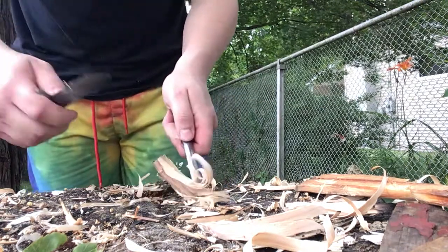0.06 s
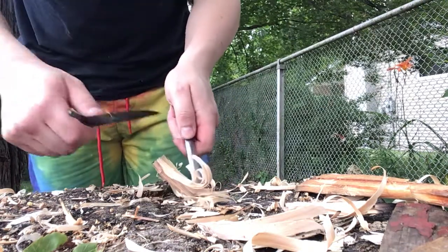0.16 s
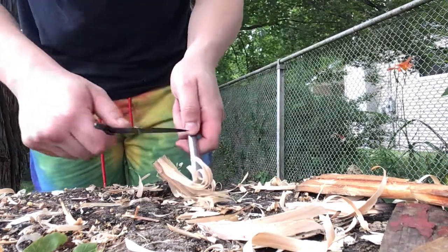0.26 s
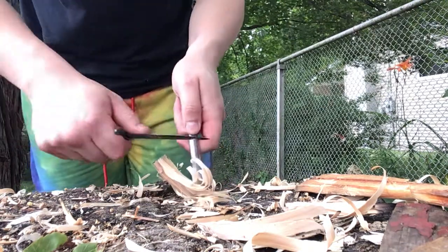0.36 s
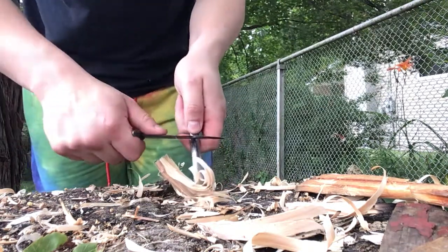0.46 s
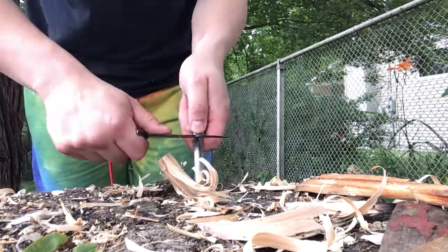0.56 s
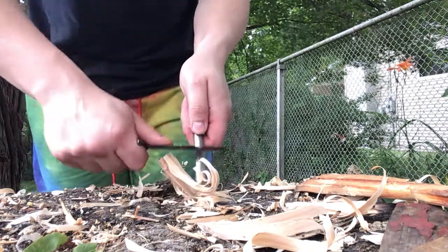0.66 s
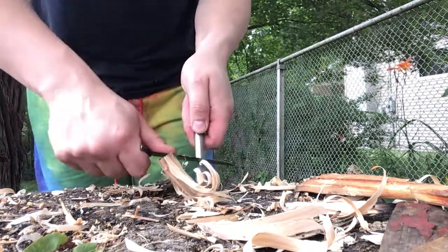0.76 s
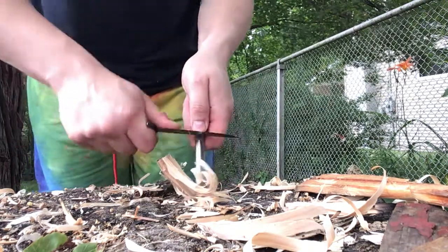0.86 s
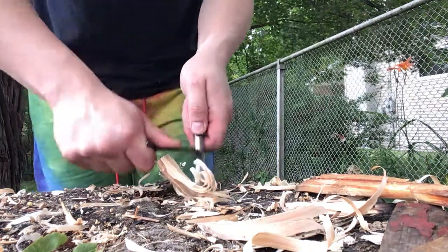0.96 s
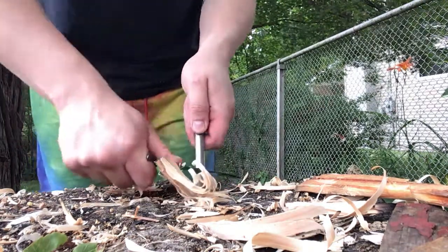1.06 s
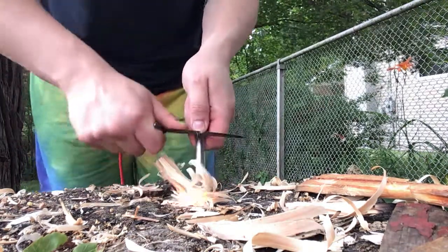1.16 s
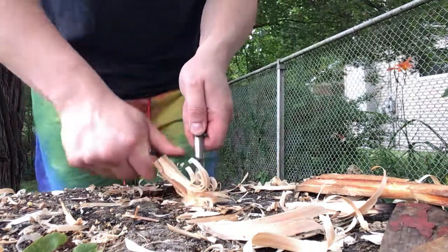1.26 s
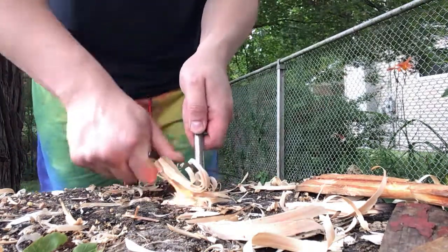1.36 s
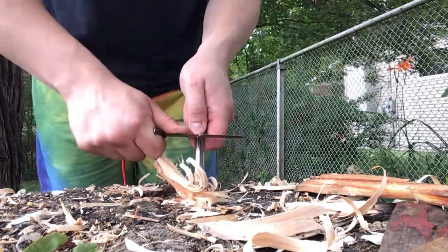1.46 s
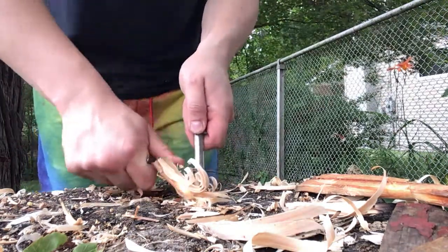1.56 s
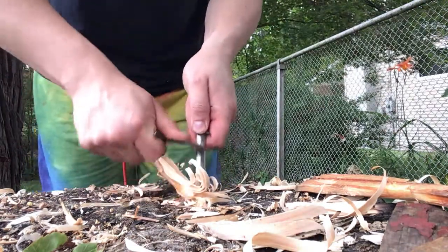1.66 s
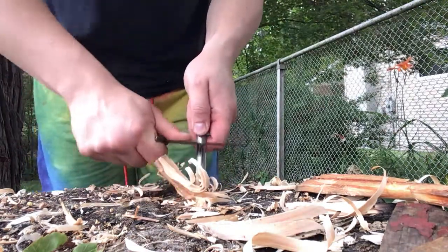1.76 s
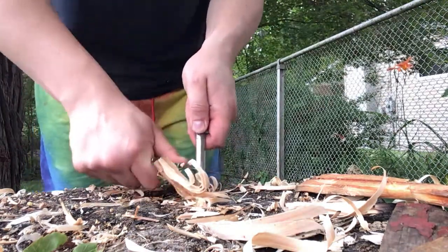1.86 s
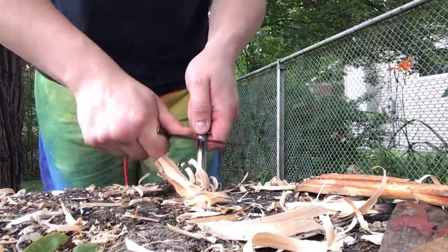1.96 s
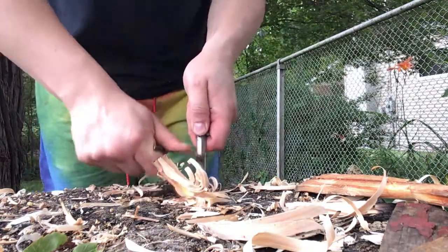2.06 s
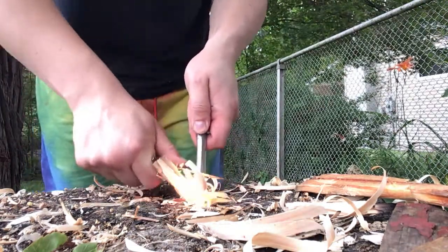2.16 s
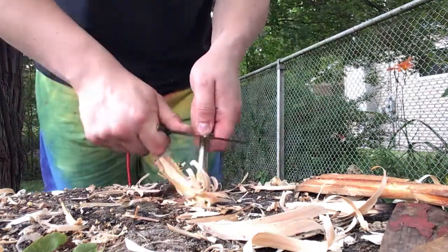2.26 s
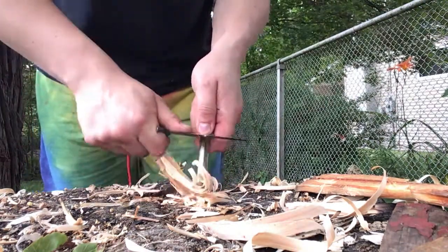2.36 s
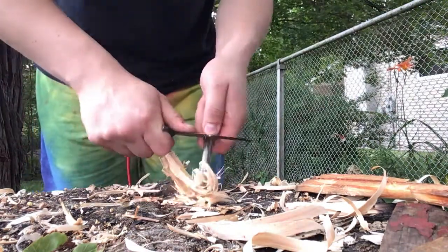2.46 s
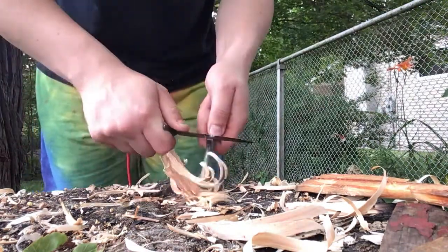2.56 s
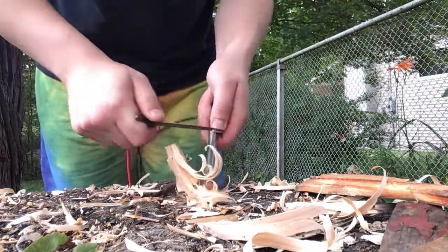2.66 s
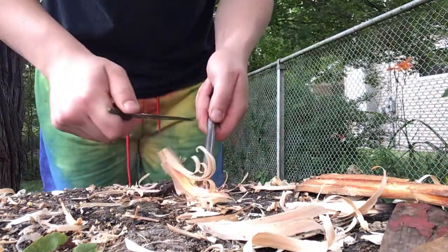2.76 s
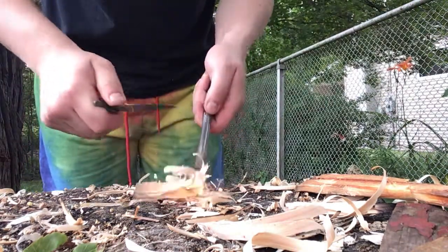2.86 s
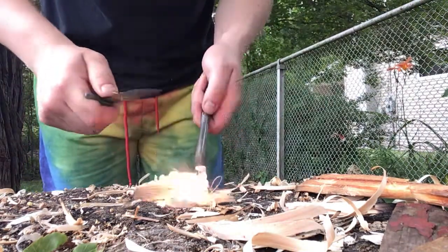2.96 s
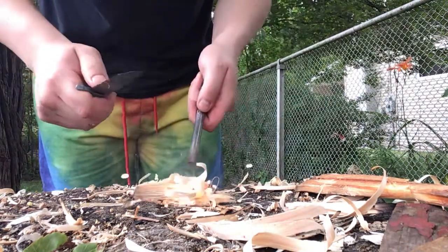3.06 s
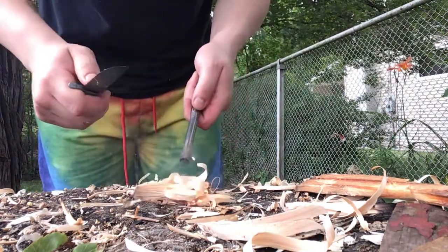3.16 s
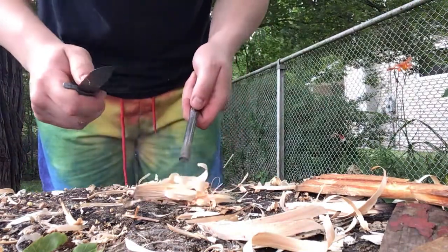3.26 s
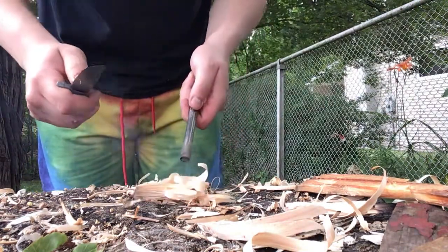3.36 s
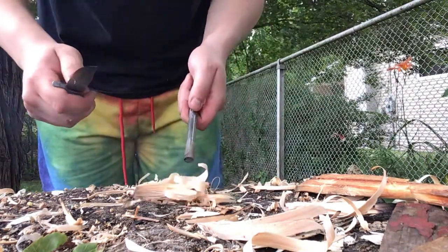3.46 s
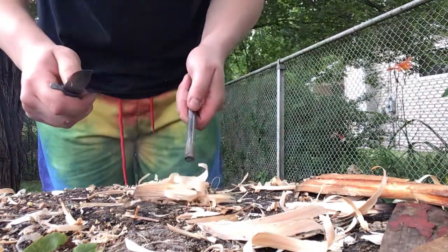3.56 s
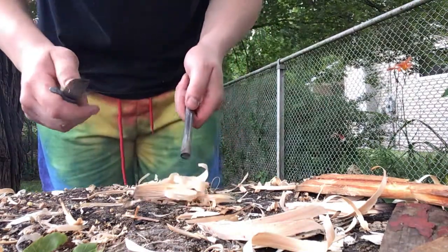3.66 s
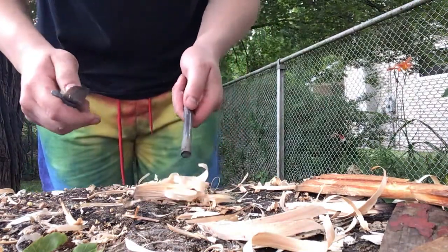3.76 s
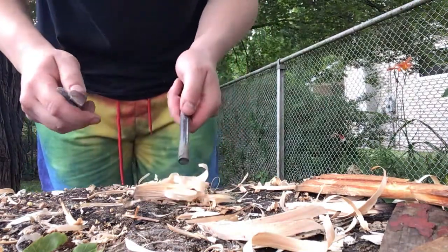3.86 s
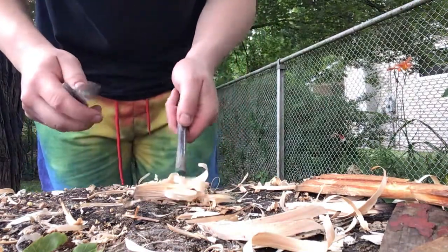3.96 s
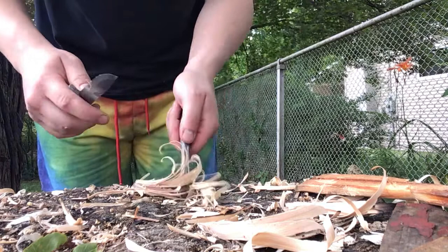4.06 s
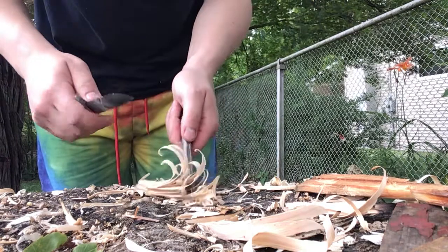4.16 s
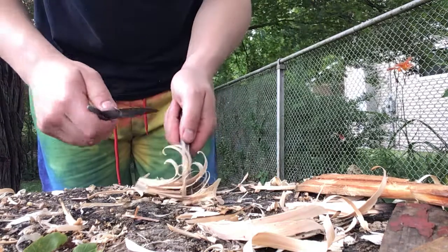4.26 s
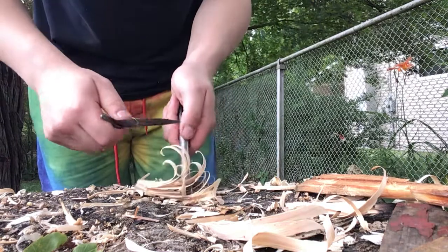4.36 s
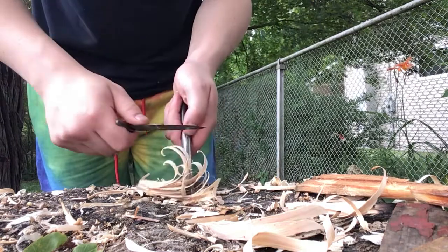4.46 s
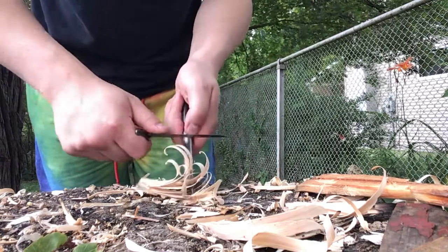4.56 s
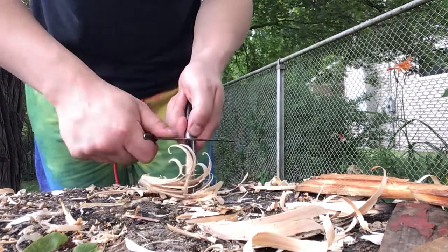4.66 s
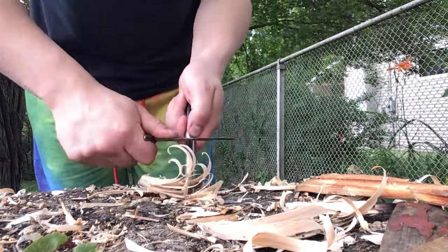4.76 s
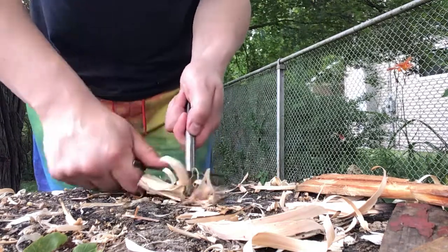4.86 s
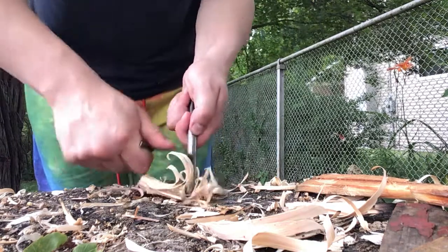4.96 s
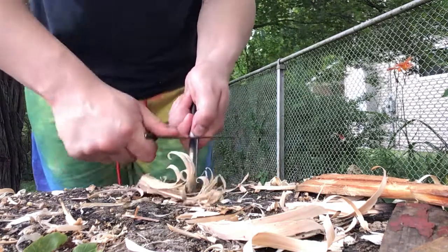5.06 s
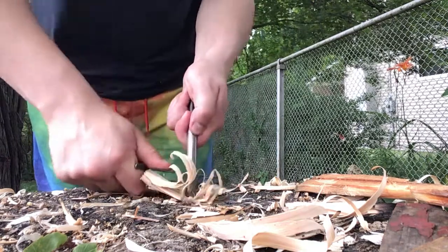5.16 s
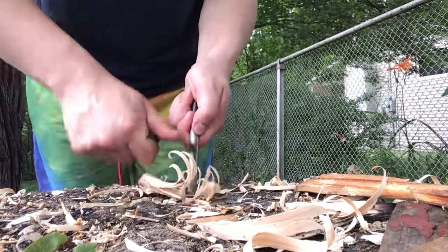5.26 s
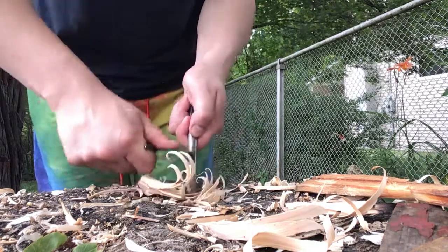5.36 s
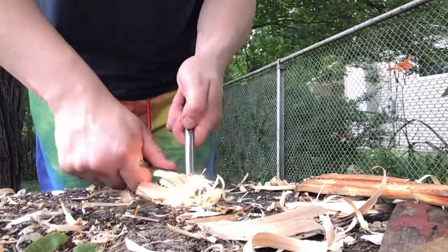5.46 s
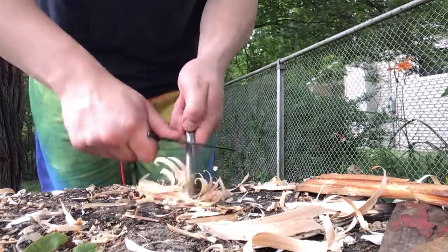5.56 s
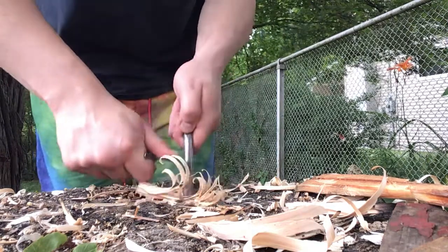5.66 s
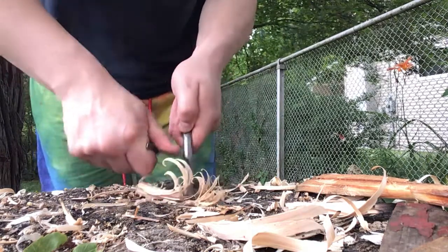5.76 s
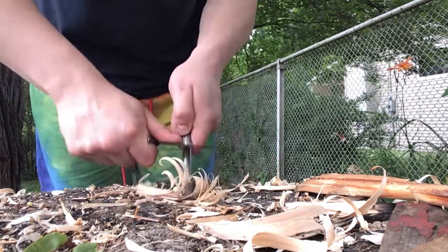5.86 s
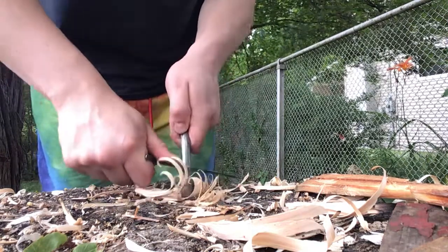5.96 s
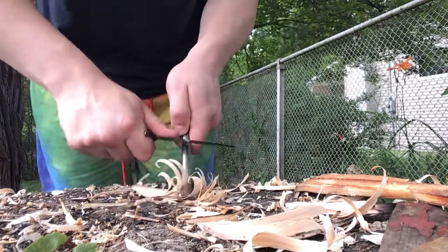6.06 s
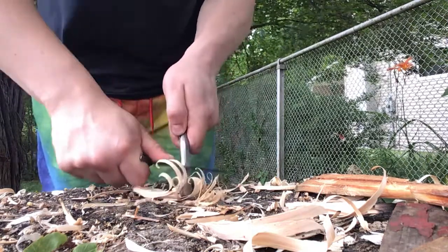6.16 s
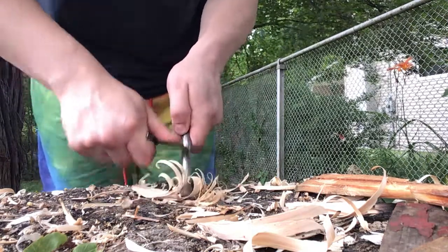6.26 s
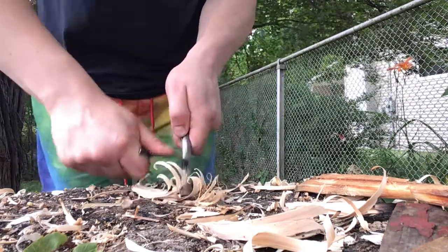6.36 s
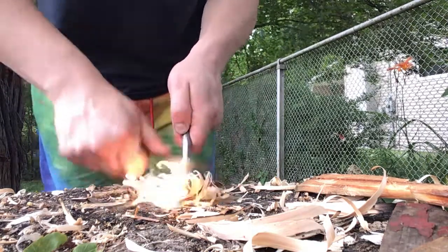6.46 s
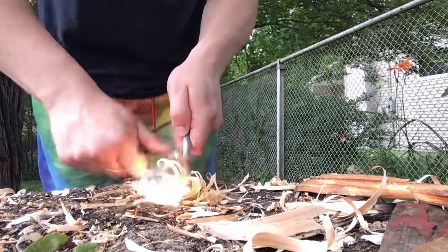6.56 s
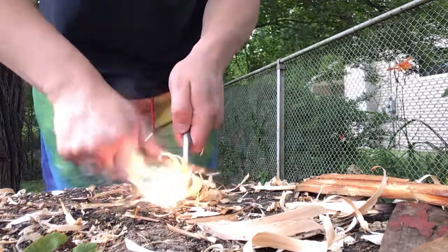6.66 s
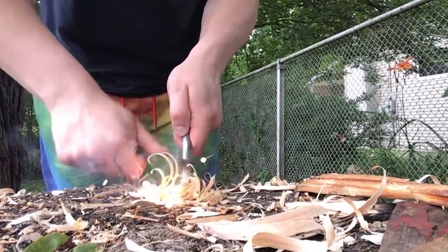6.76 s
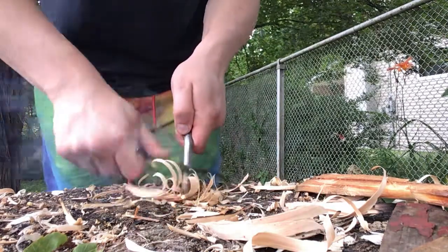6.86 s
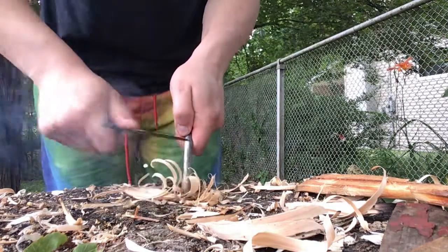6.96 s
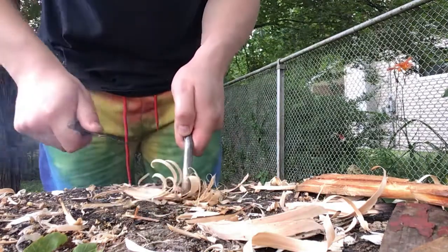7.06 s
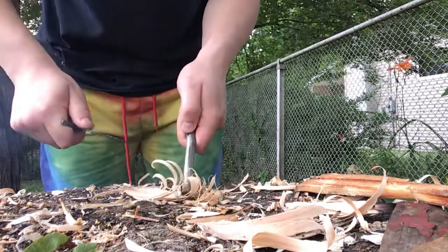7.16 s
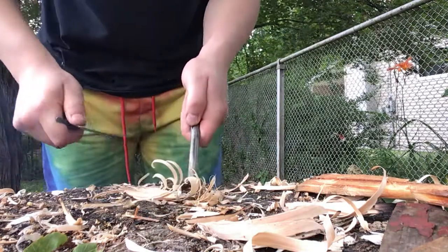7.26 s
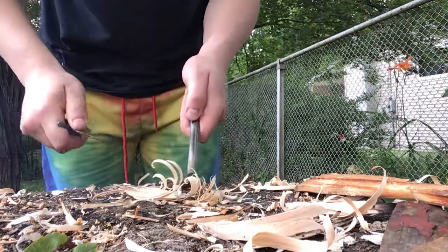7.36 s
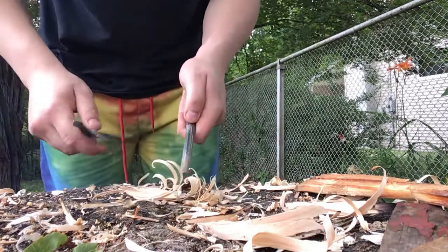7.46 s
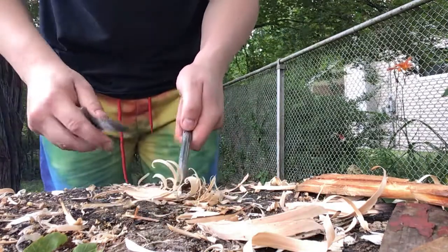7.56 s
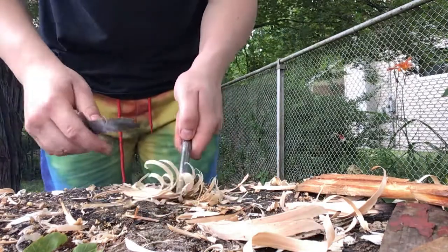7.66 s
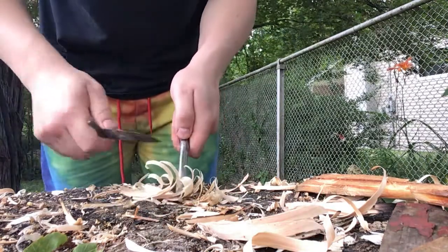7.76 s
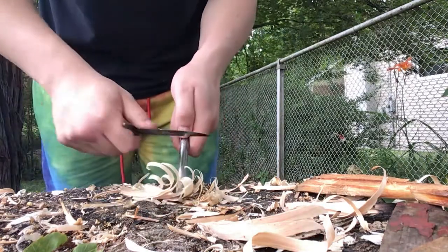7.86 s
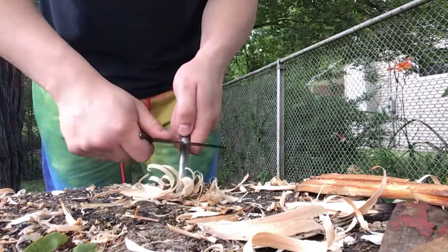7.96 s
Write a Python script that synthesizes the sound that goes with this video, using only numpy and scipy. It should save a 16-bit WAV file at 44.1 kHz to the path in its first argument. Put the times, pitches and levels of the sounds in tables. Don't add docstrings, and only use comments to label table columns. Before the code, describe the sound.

Dry shaving ticks, then gritty metallic scrapes on a fire steel with sharp snaps, one brief squeal, faint birds and far traffic rumble.

```python
import sys
import numpy as np
from scipy import signal
from scipy.io import wavfile

SR = 44100
rng = np.random.default_rng(int(sys.argv[2]) if len(sys.argv) > 2 else 0)


def linear_from_db(decibels):
    return 10 ** (np.asarray(decibels, float) / 20)


def int16_out(signal):
    q = np.round(np.clip(np.atleast_2d(signal).T, -1, 1) * 32767)
    wavfile.write(sys.argv[1], SR, q.astype(np.int16))


N = 353858

# pitch_hz, density_db [dB per Hz]
TOWN_RUMBLE = [(20, -65), (40, -17), (62, 3), (130, -3), (210, -1), (295, -5), (420, -17)]
# pitch_hz, density_db [dB per Hz]
GARDEN_AIR = [(800, -18.5), (1400, -27.5), (2400, -28.5), (3600, -26), (7000, -35.5), (10000, -29),
              (13000, -58), (16000, -36)]
AIR_DB, ECHO_DB = -53.5, -16.5
# start_s, length_s, start_hz, end_hz, level_db
BIRD_CHIRPS = [(2.36, 0.14, 7850, 7950, -67), (2.49, 0.13, 7900, 7900, -73), (3.60, .05, 5100, 4300, -72),
               (3.82, 0.043, 5040, 3800, -77), (4.36, 0.019, 8100, 6400, -67.5),
               (6.81, 0.027, 4680, 3520, -66), (6.963, 0.041, 5585, 3790, -60),
               (7.04, 0.059, 4440, 3500, -68), (7.12, 0.028, 4250, 3310, -65.5),
               (7.23, 0.062, 4400, 3350, -66.5), (7.72, 0.028, 9100, 8340, -71),
               (7.835, 0.03, 8900, 8600, -68), (7.855, .03, 8600, 8050, -72)]

# pitch_hz, width_hz, level_db
WOOD_MODES = [(173, 76, -1.5), (500, 275, -5), (870, 115, -1.5), (1258, 188, -6.5), (1570, 404, -6.5),
              (1966, 353, -7)]
# pitch_hz, width_hz, level_db
ROD_MODES = [(2906, 245, 7), (3350, 840, 5), (3645, 326, 8), (4550, 860, 1)]
# pitch_hz, width_hz, level_db
UPPER_ROD_MODES = [(5350, 1000, -9), (6723, 684, 10), (6685, 1100, 8.5), (8620, 260, -11)]
# pitch_hz, width_hz, level_db
EDGE_MODES = [(10510, 1100, -6), (11080, 740, 4), (12450, 890, 2.5), (13950, 1340, 2), (14800, 1230, 0)]
# pitch_hz, width_hz, level_db
WHISTLE_MODE = [(13620, 260, 0)]
# pitch_hz, width_hz, level_db
LOW_WHISTLE_MODE = [(9890, 350, 0)]
# pitch_hz, width_hz, level_db
SHAKEN_MODES = [(3040, 550, 0), (4200, 600, -2), (6300, 390, 1.5), (7530, 300, 1), (9650, 400, 0),
                (12160, 700, 2), (13800, 540, 5)]
# ratio [to the main partial], level_db
CHATTER_PARTIALS = [(.75, -11), (1, 0), (1.495, -8), (1.745, -16)]

# start_s, peak_db
SHAVING_TICKS = [(0.036, -35), (0.0794, -50), (0.0972, -45), (0.1184, -48), (0.1281, -45), (0.1374, -52),
                 (0.152, -39), (0.168, -44), (0.2079, -48), (0.2164, -49), (0.2423, -48), (0.2882, -50),
                 (0.3132, -40), (0.323, -49), (0.3391, -48), (0.3661, -51), (0.4389, -49), (0.5437, -60),
                 (0.618, -49), (0.7547, -57), (0.8041, -53), (1.035, -58), (1.053, -55), (1.0665, -54),
                 (1.0814, -55), (1.865, -48), (2.449, -50), (5.69, -54), (5.705, -54), (6.864, -53),
                 (2.439, -47), (3.9835, -40), (4.039, -42), (4.1819, -51), (4.4109, -48), (4.5046, -49),
                 (7.1212, -46), (7.1467, -51)]
# start_s, pitch_hz, peak_db, t60_s
LONE_RINGS = [
    (0.4732, 3000, -36, .012),
    (3.2031, 462, -25, 0.017),
    (3.2052, 172, -35, .055),
    (4.5955, 2680, -40, .014),
    (4.5955, 6150, -40, .014),
    (7.947, 9620, -42, .03),
    (7.947, 1585, -38, 0.02),
    (7.947, 3700, -29, 0.016),
    (7.947, 5830, -37, .016),
]
# start_s, length_s, main_partial_hz [at the start], level_db
CHATTER_LINES = [
    (0.475, 0.24, 3620, -63.5),
    (0.73, 0.091, 3510, -72),
    (0.871, 0.23, 3550, -65),
    (4.605, 0.21, 3640, -63),
    (4.843, 0.082, 3530, -76),
    (4.945, 0.12, 3590, -59),
    (5.128, .06, 3480, -63),
]
# start_s, length_s, start_hz, end_hz, level_db
BLADE_CLIMBS = [
    (4.61, 0.14, 4170, 4550, -69),
    (4.85, 0.12, 4600, 4900, -66),
]
# start_s, second_partial_hz, second_partial_db, first_partial_db [above the second]
SQUEAL_PATH = [
    (0.838, 5160, -48, -3),
    (0.847, 5030, -30.5, -4.5),
    (0.853, 5040, -33, -6),
    (0.857, 4610, -24.5, -4),
    (0.861, 4840, -31, -9),
    (0.867, 4900, -18.5, -17.5),
    (0.868, 4760, -27.5, -5),
    (0.872, 5440, -41.5, 5.5),
    (0.877, 4900, -36, -23),
]

# start_s, peak_db, wood_db [above rod], edge_db [above rod]
CATCHES = [(1.3483, -27.5, -9, -15), (1.3733, -32, -9.5, -8), (1.4526, -29.5, -11.5, -23),
           (1.6248, -18.5, -9.5, -10.5), (1.8742, -32, -13, -7), (2.3, -30, -11, -7),
           (2.3213, -21, -14.5, -11), (2.462, -31.5, -17, -13), (2.4752, -19, -10, -12),
           (2.7258, -25.5, -26, -18), (2.9245, -32, -14, -21), (2.9614, -41, 10.5, 6),
           (2.9917, -23, -5.5, -9.5), (3.235, -31, -4.5, -9), (3.2494, -29, -16, -15),
           (3.27, -29, -4.5, -21), (3.372, -37, -6.5, -13), (3.3925, -46, -18, -7),
           (3.6919, -27.5, -10, -11), (3.9444, -54, 0, -9), (4.2153, -49, -18, -7),
           (6.3723, -30.5, -27, -7), (6.8533, -49, 0, -16), (6.875, -39, -23, -9), (6.9082, -36.5, -11, -2),
           (6.9394, -34.5, -10, -10), (7.0094, -46.5, -7, -16)]
# start_s, peak_db, wood_db [above rod], edge_db [above rod]
SHARP_SNAPS = [(1.1272, -26, -11, -24), (1.6871, -15, -30, 1), (1.722, -22.5, -32, 6),
               (1.9044, -16, -12, -2), (1.9578, -15.5, -11, -2), (1.9754, -19, -27, -20),
               (2.002, -29, -30, -20), (2.707, -31, -19, -20), (2.7195, -30, -18, -20),
               (2.7872, -21, -24, -12), (2.9035, -28, -17, -20), (3.02, -29, -13, -20),
               (3.053, -40, -12, -16), (3.069, -27, -18, -18), (2.803, -16.5, -24, -15),
               (2.8394, -38, -12, -27), (2.9814, -14, -23, -15), (3.0077, -10.5, -29, -8),
               (3.2025, -6.5, -6, -2), (5.223, -38, -4, -22), (5.389, -42, -13, -9), (5.4246, -18, -6, 4),
               (5.46, -21, -15, -21), (5.5797, -16, -9, -1), (5.5914, -28, -22, -19), (5.89, -19, -11, -2),
               (6.4944, -27, -6, -6), (6.6112, -23, -9, -18)]
# start_s, peak_db, edge_db [above rod]
GRIT_CRACKLES = [(0.964, -42, -12), (1.148, -30, -15), (1.342, -41, -10), (1.4614, -37, -14),
                 (1.5171, -39, -9), (1.5792, -36, -18), (1.6116, -36.0, -11), (1.62, -34, -10),
                 (1.631, -29.0, -12), (1.6582, -35, -4), (1.6737, -37.0, -2), (1.737, -36.0, -9),
                 (1.8442, -36.0, 0), (1.945, -43, -10), (2.019, -34.0, -17), (2.1173, -37, -2),
                 (2.1551, -37.0, -9), (2.16, -39, -8), (2.1643, -35.0, -9), (2.172, -34, -12),
                 (2.1906, -30, -9), (2.202, -34.0, -8), (2.2074, -39, -18), (2.2454, -35.0, -5),
                 (2.2693, -31, -7), (2.3307, -35, -13), (2.469, -34, -19), (2.5684, -40, -7),
                 (2.6348, -37, -11), (2.6866, -35, -14), (2.7547, -32, -10), (2.7605, -31, -13),
                 (2.7956, -38, -17), (2.8348, -38, -12), (2.845, -39, -16), (3.0156, -32.0, -12),
                 (3.1025, -39.0, -17), (3.1354, -43, -8), (3.7011, -43.0, -9), (3.9954, -51, 16),
                 (5.055, -47, -14), (5.1117, -34, -18), (5.216, -43, -25), (5.412, -34.0, -2),
                 (5.4356, -31.0, -7), (5.4673, -27, -6), (5.601, -37, -12), (5.7532, -47, -12),
                 (6.468, -38, -16), (6.4815, -33, -10), (6.58, -38, -16), (6.6443, -32, -10),
                 (6.8856, -38, -6), (6.926, -33, -9), (6.946, -44, -6)]
# start_s, peak_db, wood_db [above rod], edge_db [above rod]
SPINE_TAPS = [
    (0.4730, -35, -3, -11),
    (4.5945, -25, -13.5, -8),
    (7.9467, -21.5, -23, -10),
]

# start_s, length_s, peak_share, peak_db, contact_hz
GLIDING = [(0.636, 0.094, 0.52, -51, 3670), (0.944, 0.092, 0.16, -46, 3700),
           (1.199, 0.13, 0.61, -47.5, 3350), (1.408, 0.057, 1, -50.5, 4000), (1.483, .12, 0.71, -46, 3920),
           (1.763, 0.087, 0.64, -49, 4000), (1.892, 0.17, 0.56, -44, 3830), (2.045, 0.12, 0.52, -46, 3980),
           (2.32, 0.053, .05, -59, 3680), (4.758, 0.095, 0.62, -47.5, 3350), (4.908, 0.087, 0.6, -52, 3140),
           (5.05, 0.09, 0.63, -47.5, 3400), (5.316, 0.0883, 0.87, -45, 3400), (5.572, 0.11, 0, -44.5, 3600),
           (5.741, 0.048, .6, -52.5, 3200), (5.839, 0.077, 0.62, -48, 3240),
           (6.075, 0.089, 0.25, -49.5, 3530), (6.318, 0.052, 0.5, -47.5, 3440)]
# start_s, length_s, peak_share, peak_db, contact_hz
DIGGING = [(1.335, 0.075, 1, -48.5, 3350), (1.604, 0.14, 0.61, -47.5, 3650),
           (2.157, 0.12, 0.086, -43, 3800), (2.54, 0.059, .4, -52, 3900), (2.628, 0.085, 0.96, -49.5, 2900),
           (2.719, 0.054, 0.46, -42.5, 3580), (2.783, 0.079, 0.21, -43.5, 3860),
           (2.87, 0.049, 0.6, -50.5, 3560), (2.931, 0.13, 0.48, -41, 3800),
           (3.068, 0.12, 0.65, -52.5, 3550), (5.406, 0.11, .05, -39, 3850), (6.372, 0.16, 0.2, -39, 3670),
           (6.535, 0.19, 0.49, -41.5, 3750)]
# start_s, length_s, peak_share, peak_db, contact_hz
THUMB_CHOKED = [
    (0.816, 0.02, .95, -51.5, 2830),
    (1.133, 0.06, 0.34, -44, 2720),
    (5.208, 0.057, 0.088, -46.5, 2530),
    (5.993, 0.044, 0.065, -53, 3500),
    (6.227, 0.044, 0.99, -50.5, 2400),
]
# start_s, length_s, peak_share, peak_db, contact_hz
BRUSHING = [
    (0.01, 0.046, 0.4, -58, 4460),
    (0.09, 0.28, 0.29, -66.5, 3650),
    (2.484, 0.019, .05, -52, 3620),
    (3.21, 0.086, 0.89, -54.5, 3700),
    (3.97, 0.21, .05, -63, 3400),
    (6.85, 0.11, 0.66, -61, 3470),
    (7.585, 0.076, 0.19, -59, 3500),
]
# start_s, length_s, peak_share, peak_db, contact_hz
SIZZLING = [
    (6.545, 0.074, .5, -54.5, 3300),
    (6.73, 0.053, .1, -53.5, 2800),
]
# swell [dB/s], fade [dB/s], wood_db, upper_rod_db, edge_db [above the rod]
GRIP_SHAPES = [
    (91.5, 142, -4.5, 1, -4.5),
    (87, 66, -0.5, 0.5, -8.5),
    (121, 118, -2.5, -11, -8),
    (110, 150, -3.5, 2.5, -2),
    (60, 60, -4, 5, 2),
]
GRIP_WHISTLE_DB = [
    -0.5,
    -8,
    -2,
    -12,
    -9.5,
]
GRIP_SAG_HZ_PER_S = [
    500,
    797,
    14100,
    300,
    300,
]
GRIP_CONTACT_DB = [
    -18,
    -27,
    -17.5,
    -24.5,
    -21.5,
]

CATCHES_PER_S, CRUNCH_MS, TAP_MS = 5400, 3.23, 2.6
CRACKLE_LIFT_DB, CRACKLE_WOOD_DB, REBOUND = 7, -29, 0.46
DULLING_DB_PER_S, LOW_WHISTLE_DB = 2.0, -16
SHOULDER_DB, SHOULDER_FADE_DB_PER_S = -5.5, 2
CHATTER_SAG_HZ_PER_S, CHATTER_FLICKER_DB = 520, 2.5


def rms_one(x):
    return x / np.sqrt(np.mean(x ** 2) + 1e-20)


def flicker(per_s, spread_db, step=100):
    r = np.exp(-2 * np.pi * step * per_s / SR)
    white = rng.standard_normal(N // step + 1002)
    slow = signal.lfilter([1], [1, -2 * r, r * r], white)[1000:]
    return np.interp(np.arange(N) / step, np.arange(len(slow)), linear_from_db(spread_db * rms_one(slow)))


def drift(per_s, step=100):
    return np.log(flicker(per_s, 20 / np.log(10), step))


def grit(per_s, spread_db):
    sizes = linear_from_db(spread_db * np.minimum(rng.exponential(1, N), 5)) * rng.choice([-1, 1], N)
    return rms_one(sizes * (rng.random(N) < per_s / SR))


def ring(clicks, hz, t60):
    r = np.exp(-3 * np.log(10) / (t60 * SR))
    w = 2 * np.pi * hz / SR
    return signal.lfilter([0, np.sin(w)], [1, -2 * r * np.cos(w), r * r], clicks + 1e-18)


def body(force, modes, damping=1, patchy_db=0):
    out, power = 0, 0
    floor = 1e-18 * (-1.) ** (np.arange(force.shape[-1]) // 2)
    for k, (hz, width, level_db) in enumerate(modes):
        r = np.exp(-np.pi * width * damping / SR)
        b = (1 - r * r) / 2 * np.array([1, 0, -1])
        a = [1, -2 * r * np.cos(2 * np.pi * hz / SR), r * r]
        wax = flicker(11, patchy_db) if patchy_db else 1
        out = out + (-1) ** k * linear_from_db(level_db) * signal.lfilter(b, a, force * wax + floor)
        power += linear_from_db(2 * level_db) * np.pi * width * damping / SR
    return out / np.sqrt(power)


def moving_resonance(force, hz, width_hz, size=256):
    out, state, r = np.zeros(N), np.zeros(2), np.exp(-np.pi * width_hz / SR)
    for i in range(0, N, size):
        poles = [1, -2 * r * np.cos(2 * np.pi * hz[i] / SR), r * r]
        out[i:i + size], state = signal.lfilter([1, 0, -1], poles, force[i:i + size], zi=state)
    return out


def whistles(rows):
    out = np.zeros(N)
    for s, length, start_hz, end_hz, db in rows:
        at, count = round(s * SR), round(length * SR)
        phase = 2 * np.pi * np.cumsum(np.geomspace(start_hz, end_hz, count)) / SR
        out[at:at + count] += linear_from_db(db) * np.sqrt(np.hanning(count)) * np.sin(phase)
    return out


def echoes(x, t60):
    t = np.arange(round(.3 * SR)) / SR
    cloud = rng.standard_normal(len(t)) * (t > .004) * np.exp(-np.log(1000) * t / t60)
    return signal.fftconvolve(x, cloud / np.sqrt(np.sum(cloud ** 2)))[:N]


def air():
    out, edges = 0, 18 * 2 ** np.arange(0, 10.1, .5)
    white = rng.standard_normal((2, N + SR))
    hz, db = np.transpose(TOWN_RUMBLE + GARDEN_AIR)
    for k, (low, high) in enumerate(zip(edges, edges[1:])):
        band_pass = signal.butter(2, [low, high], "band", fs=SR, output="sos")
        band = signal.sosfilt(band_pass, white[k % 2])[SR:]
        out = out + linear_from_db(np.interp(np.log(low * high) / 2, np.log(hz), db)) * band
    return linear_from_db(AIR_DB) * rms_one(out)


def birds():
    calls = whistles(BIRD_CHIRPS) * flicker(90, spread_db=5.5)
    return calls + linear_from_db(-4) * echoes(calls, t60=0.26)


def ticks():
    force, snap = np.zeros(N), rng.standard_normal((len(SHAVING_TICKS), 200))
    decay = np.exp(-np.arange(200) / (0.001 * SR))
    for (s, db), noise in zip(SHAVING_TICKS, snap):
        at = round(s * SR)
        force[at:at + 200] += linear_from_db(db - 6.0) * noise * decay
    treble = body(force, EDGE_MODES[1:4] + WHISTLE_MODE, damping=0.89)
    return treble + linear_from_db(8) * body(force, UPPER_ROD_MODES) + linear_from_db(2) * body(force, ROD_MODES, damping=2.0)


def pings():
    out, t = np.zeros(N + SR), np.arange(SR // 4) / SR
    for s, hz, db, t60 in LONE_RINGS:
        at = round(s * SR)
        out[at:at + len(t)] += linear_from_db(db - 60 * t / t60) * np.sin(2 * np.pi * hz * t)
    return out[:N]


def chatter():
    t, gain, path = np.arange(N) / SR, np.zeros(N), []
    for s, length, hz, db in CHATTER_LINES:
        gain += linear_from_db(db + 3) * np.clip(np.minimum(t - s, s + length - t) / .01, 0, 1)
        path += [(s, hz), (s + length, hz - CHATTER_SAG_HZ_PER_S * length)]
    s, hz = np.transpose(path)
    turns = np.cumsum(np.interp(t, s, hz)) / SR
    lines = 0
    for ratio, db in CHATTER_PARTIALS:
        wander = np.cumsum(drift(4.53)) * ratio * 8.3 / SR
        line = np.sin(2 * np.pi * (ratio * turns + wander))
        lines = lines + linear_from_db(db) * flicker(35, CHATTER_FLICKER_DB) * line
    return whistles(BLADE_CLIMBS) + gain * lines


def squeal():
    s, hz, db, first_db = np.transpose(SQUEAL_PATH)
    t = np.arange(N) / SR
    phase = np.pi * np.cumsum(np.interp(t, s, hz) * (1 + 0.0202 * drift(270, step=10))) / SR
    level = linear_from_db(np.interp(t, s, db, left=-120, right=-120) + 3)
    second = linear_from_db(1.1 * drift(250, step=20)) * np.sin(2 * phase)
    first = linear_from_db(np.interp(t, s, first_db) + 5.0 * drift(320, step=20)) * np.sin(phase)
    tone = level * (first + second)
    shaken = linear_from_db(-9.5) * body(level * grit(3400, 4.0), SHAKEN_MODES)
    return tone + shaken + linear_from_db(-49) * ring(tone, 4100, .15)


def strike(events, bursts, damping):
    s, db, wood_db, edge_db = np.transpose(events)[:4, :, None]
    rod = body(bursts, ROD_MODES + UPPER_ROD_MODES, damping)
    wood = body(bursts, WOOD_MODES, damping)
    edge = body(bursts, EDGE_MODES + WHISTLE_MODE, damping)
    db = db - 6.0 - 20 * np.log10(np.abs(rod).max(axis=1, keepdims=True))
    sounds = linear_from_db(db) * (rod + linear_from_db(wood_db) * wood + linear_from_db(edge_db) * edge)
    out, size = np.zeros(N + SR), bursts.shape[1]
    for at, sound in zip((s[:, 0] * SR).astype(int), sounds):
        out[at:at + size] += sound
    return out


def knocks():
    t_ms, lead = np.arange(2000) * 1000 / SR, round(.004 * SR)
    crackling = [(s - .0012, db + CRACKLE_LIFT_DB, CRACKLE_WOOD_DB, edge_db) for s, db, edge_db in GRIT_CRACKLES]
    snapping = SHARP_SNAPS + crackling
    chance = rng.random((len(CATCHES) + len(SPINE_TAPS) + len(snapping), 2000))
    crunch = rng.standard_normal(chance.shape) * (0.42 + 1.56 * (chance < .05))
    for_catches, for_taps, for_snaps = np.split(crunch, np.cumsum([len(CATCHES), len(SPINE_TAPS)]))
    build_up = np.exp(np.minimum(t_ms - 5, 0) / (0.48 * CRUNCH_MS))
    catches = build_up * np.exp(-np.maximum(t_ms - 5, 0) / CRUNCH_MS) * for_catches
    click = 1. * (t_ms == 0)
    snaps = click - REBOUND * np.roll(click, 3) + linear_from_db(-13.5) * np.exp(-t_ms / 2.0) * for_snaps
    caught = strike(CATCHES, catches, damping=1.3)
    snapped = np.roll(strike(snapping, snaps, damping=4), round(0.001084 * SR))
    tapped = strike(SPINE_TAPS, np.exp(-t_ms / TAP_MS) * for_taps, damping=2.9)
    return caught[lead:lead + N] + snapped[:N] + tapped[:N]


def pressure():
    t, gains, contact = np.arange(N) / SR, np.zeros((6, N)), []
    grips = (GLIDING, DIGGING, THUMB_CHOKED, BRUSHING, SIZZLING)
    for rows, shape, whistle_db, sag, contact_db in zip(
            grips, GRIP_SHAPES, GRIP_WHISTLE_DB, GRIP_SAG_HZ_PER_S, GRIP_CONTACT_DB):
        swell, fade, wood_db, upper_db, edge_db = shape
        for s, length, share, db, hz in rows:
            on = slice(round(s * SR), round((s + length) * SR))
            late = t[on] - s - np.clip(share, 0, 1) * length
            high_db = edge_db + whistle_db - DULLING_DB_PER_S * s
            low_db = edge_db + whistle_db + LOW_WHISTLE_DB + DULLING_DB_PER_S * s
            shares = linear_from_db(np.array([0, wood_db, upper_db, edge_db, high_db, low_db]))[:, None]
            gains[:, on] += shares * linear_from_db(db + swell * np.minimum(late, 0) - fade * np.maximum(late, 0))
            sag_hz = sag * length / 2
            contact += [(s, hz + sag_hz, contact_db), (s + length, hz - sag_hz, contact_db)]
    s, hz, db = np.transpose(sorted(contact))
    return gains, np.interp(t, s, hz), np.interp(t, s, db)


def strokes():
    gains, contact_hz, contact_db = pressure()
    lift = np.exp(-1 / (0.0034 * SR))
    settle = np.exp(-1 / (0.09 * SR))
    gains = gains + 1e-12
    rustle = signal.lfilter([1 - settle], [1, -settle], gains)
    gains = signal.lfilter([1 - lift], [1, -lift], gains) + linear_from_db(-13) * rustle
    rasp = grit(CATCHES_PER_S, 4.12) + 0.14 * grit(200, 1.5) + 0.84 * rng.standard_normal((6, N))
    rasp = rasp * flicker(91, spread_db=1.5, step=10)
    rod, wood, upper, edge, whistle, low_whistle = gains * rms_one(rasp)
    contact = moving_resonance(rod * linear_from_db(contact_db), contact_hz, width_hz=496)
    shoulder = upper * linear_from_db(SHOULDER_DB - SHOULDER_FADE_DB_PER_S * np.arange(N) / SR)
    steady = body(rod, ROD_MODES, damping=1.31, patchy_db=4.5) + body(wood, WOOD_MODES, patchy_db=0.5)
    bright = body(upper, UPPER_ROD_MODES[1:], patchy_db=1.5)
    bright = bright + body(shoulder, UPPER_ROD_MODES[:1], damping=0.78)
    bright = bright + body(edge, EDGE_MODES, patchy_db=3.0) + body(whistle, WHISTLE_MODE, patchy_db=-0.5)
    dulled = body(low_whistle, LOW_WHISTLE_MODE, patchy_db=0.5)
    return linear_from_db(-3.5) * steady + bright + dulled + contact


def scene():
    near = ticks() + pings() + chatter() + squeal() + knocks() + strokes()
    return (air() + birds() + near + linear_from_db(ECHO_DB) * echoes(near, t60=0.15))[None]


def band_limit(x):
    return signal.sosfilt(signal.butter(12, 16650, fs=SR, output="sos"), x)


def record(dry):
    thin = signal.sosfilt(signal.butter(2, 45, "high", fs=SR, output="sos"), dry)
    rounded = 0.3 * np.tanh(thin / 0.3)
    mix = signal.sosfilt(signal.cheby2(10, 60, 16900, fs=SR, output="sos"), rounded)
    return band_limit(mix)


dry = scene()
out = record(dry)
int16_out(out)
```